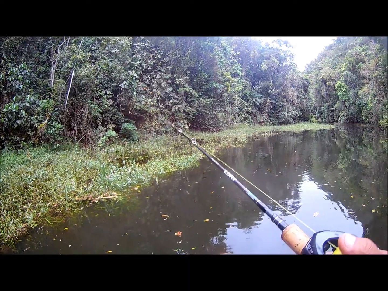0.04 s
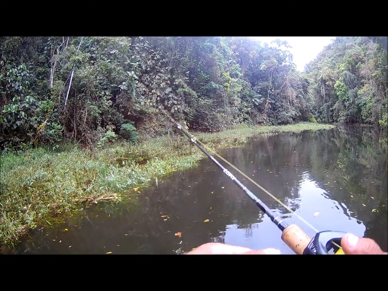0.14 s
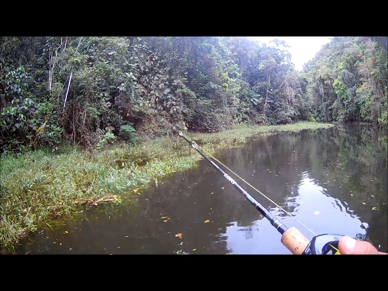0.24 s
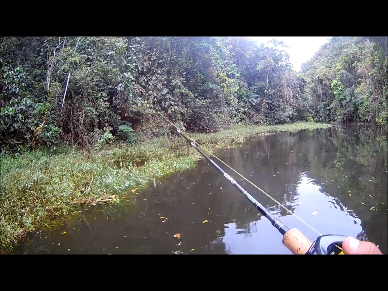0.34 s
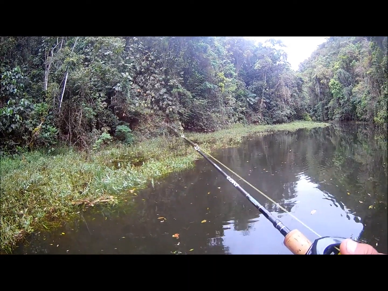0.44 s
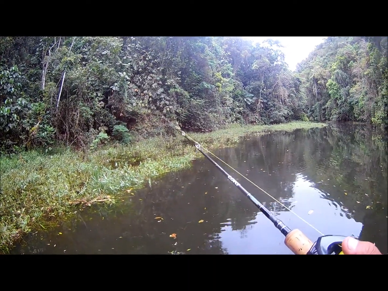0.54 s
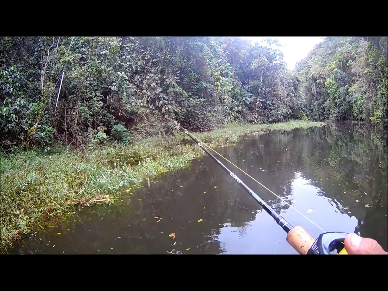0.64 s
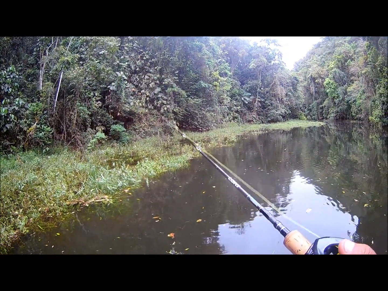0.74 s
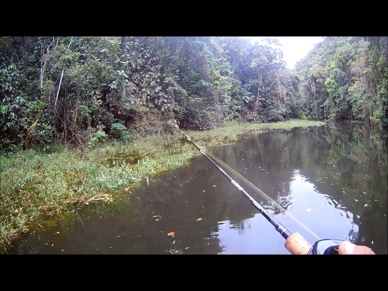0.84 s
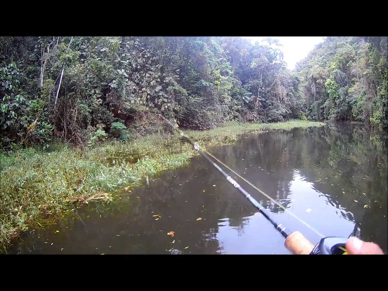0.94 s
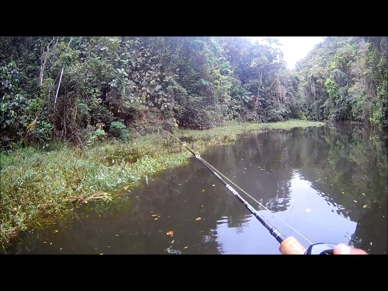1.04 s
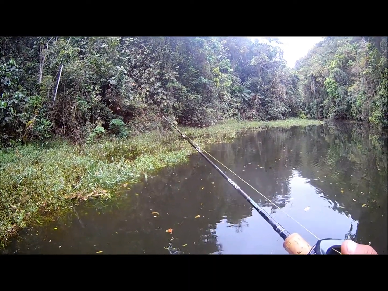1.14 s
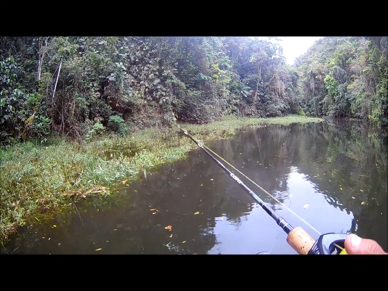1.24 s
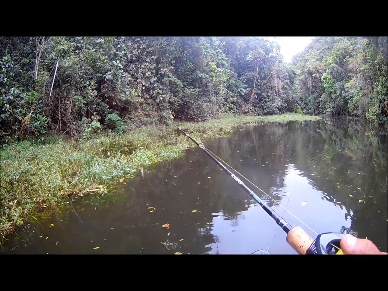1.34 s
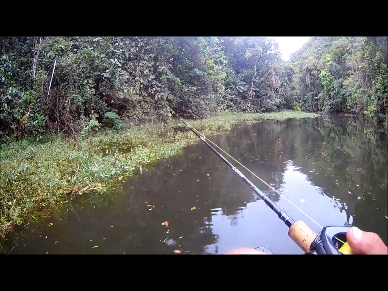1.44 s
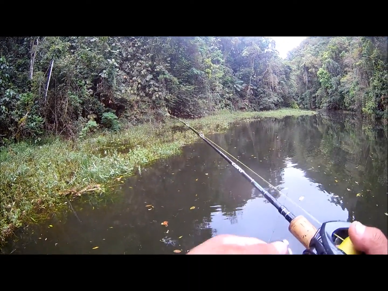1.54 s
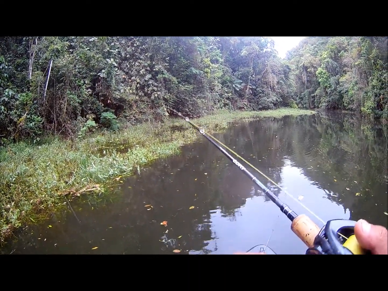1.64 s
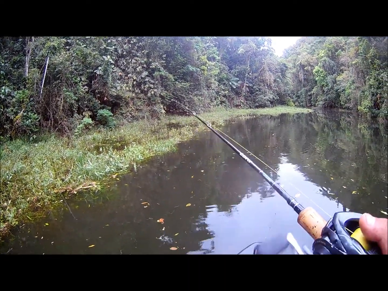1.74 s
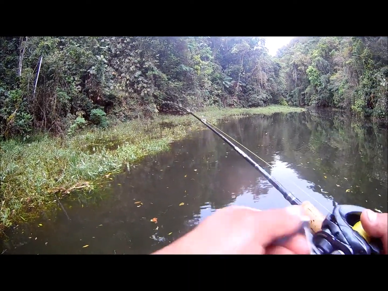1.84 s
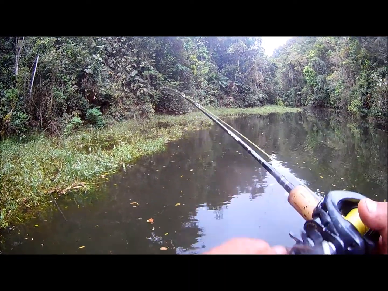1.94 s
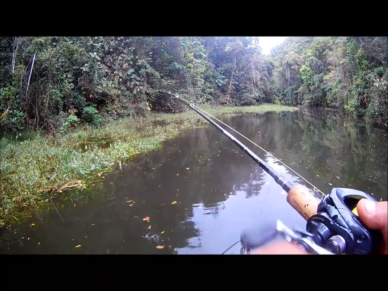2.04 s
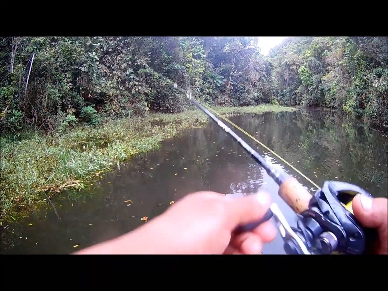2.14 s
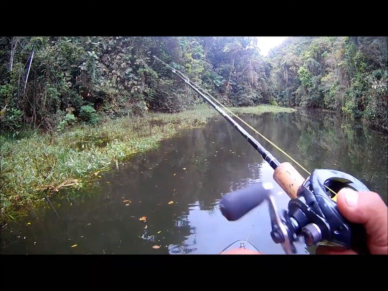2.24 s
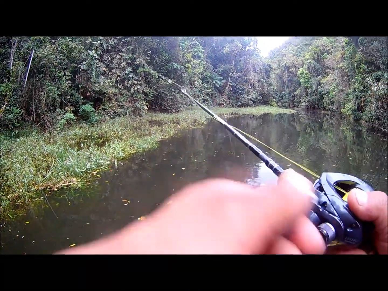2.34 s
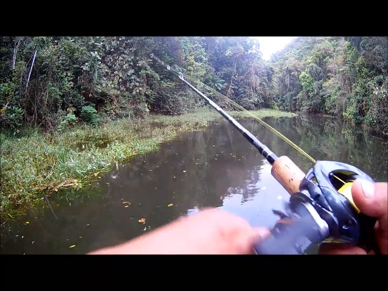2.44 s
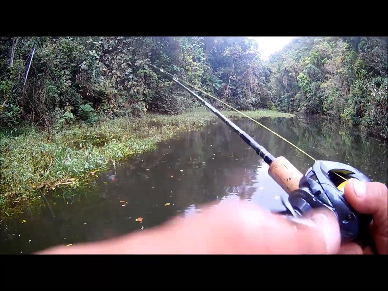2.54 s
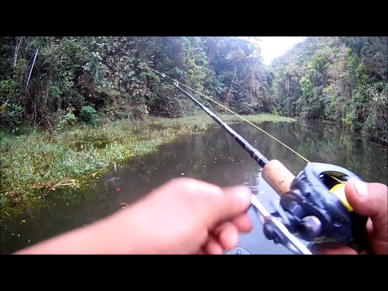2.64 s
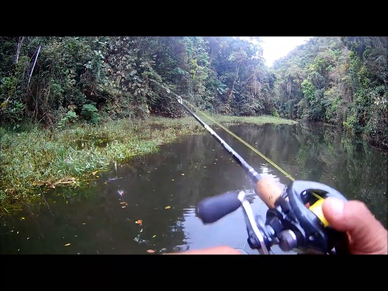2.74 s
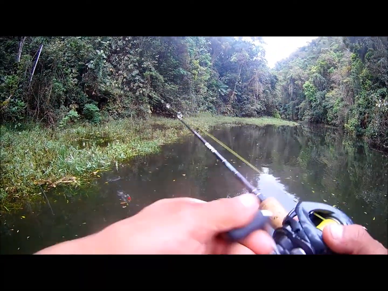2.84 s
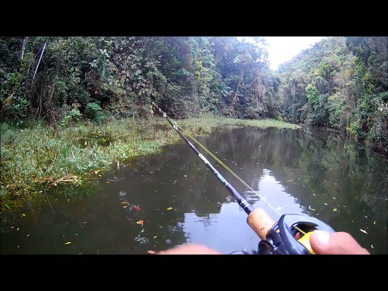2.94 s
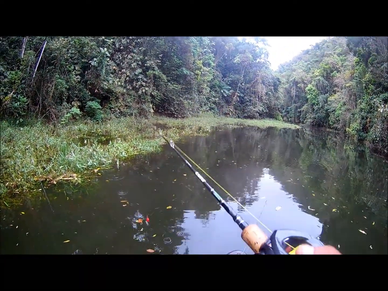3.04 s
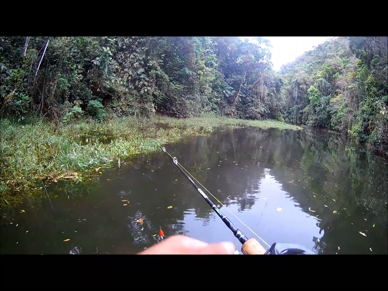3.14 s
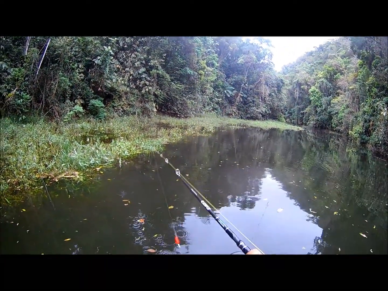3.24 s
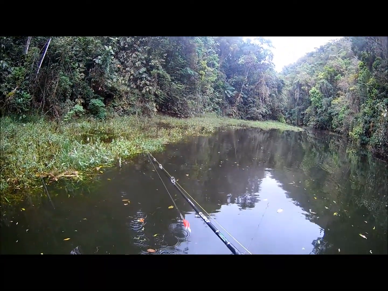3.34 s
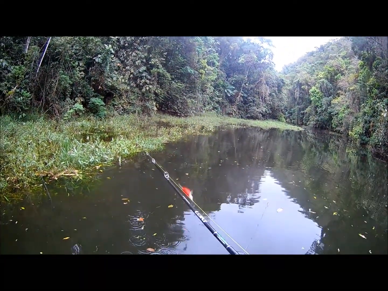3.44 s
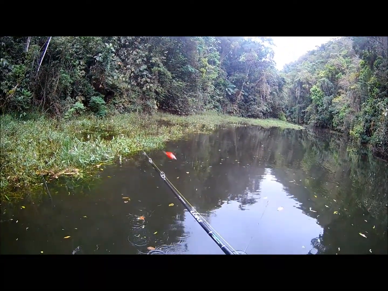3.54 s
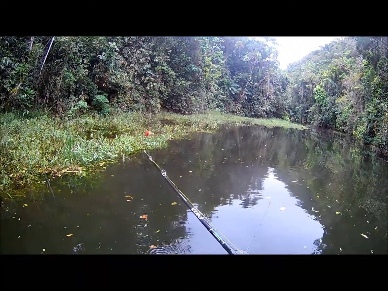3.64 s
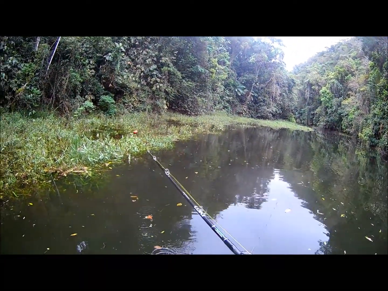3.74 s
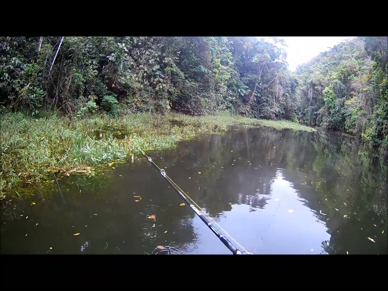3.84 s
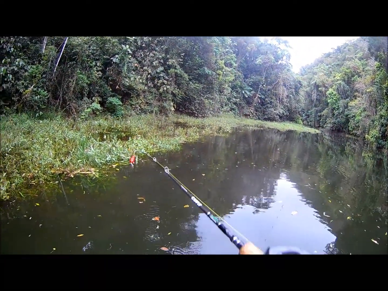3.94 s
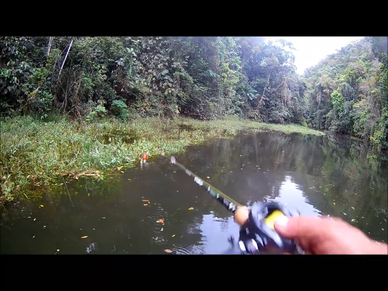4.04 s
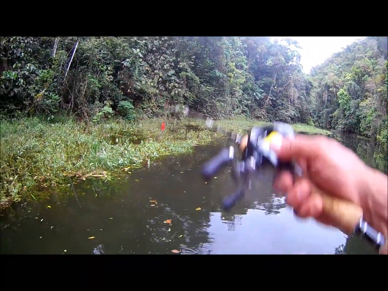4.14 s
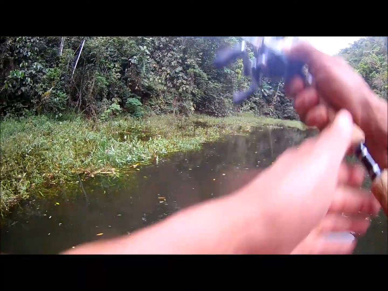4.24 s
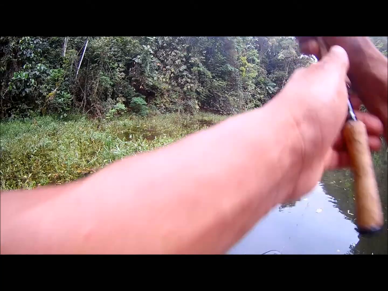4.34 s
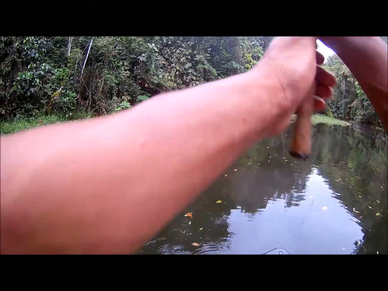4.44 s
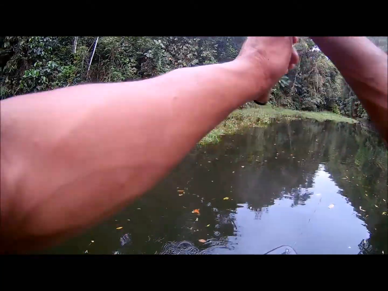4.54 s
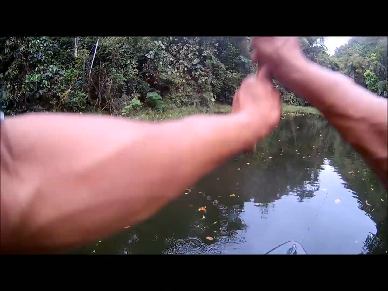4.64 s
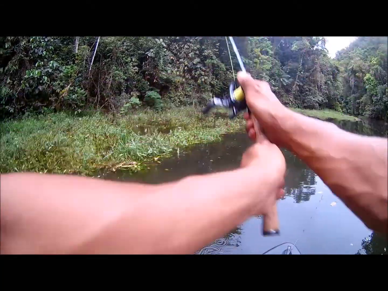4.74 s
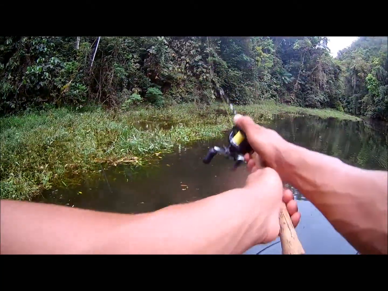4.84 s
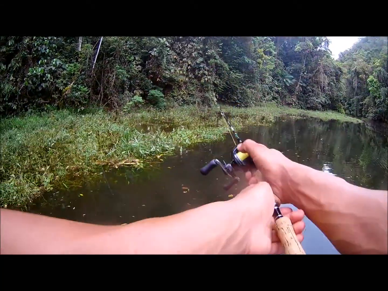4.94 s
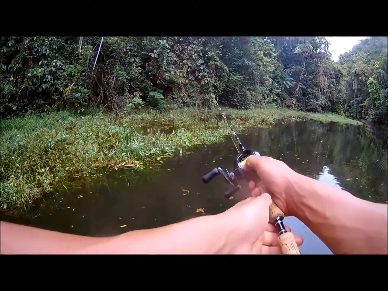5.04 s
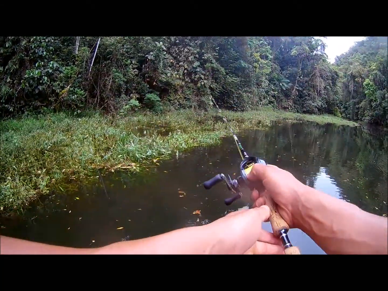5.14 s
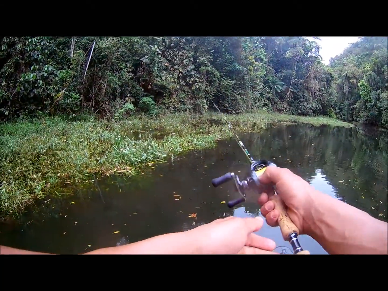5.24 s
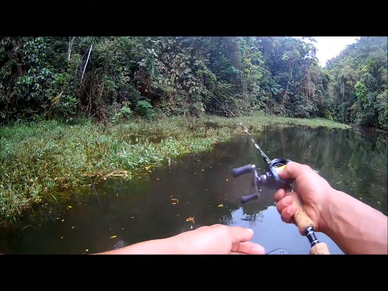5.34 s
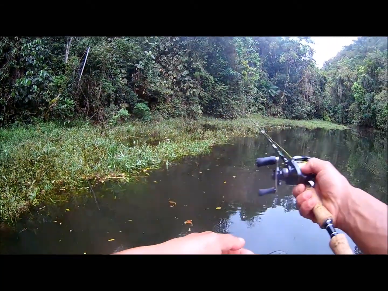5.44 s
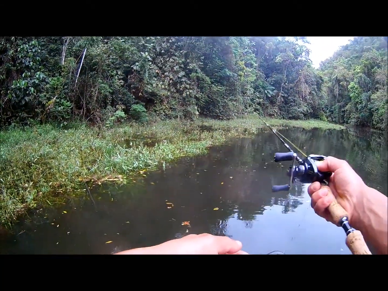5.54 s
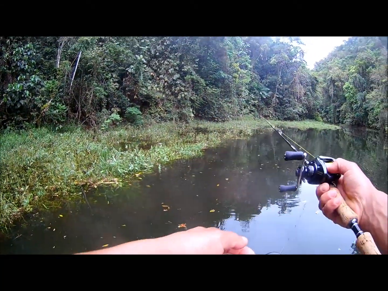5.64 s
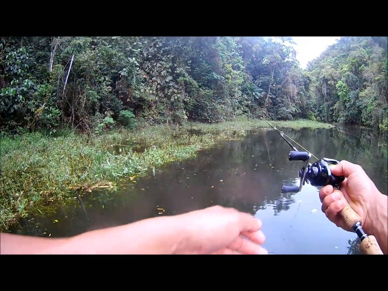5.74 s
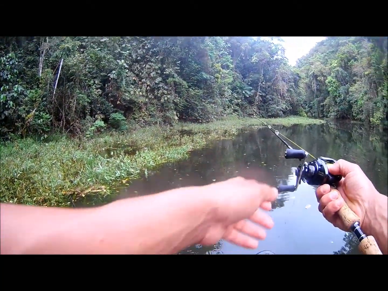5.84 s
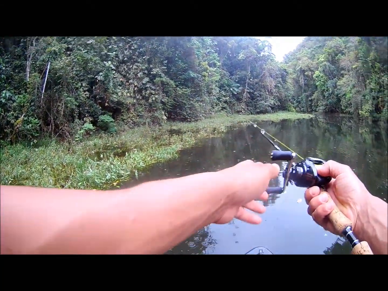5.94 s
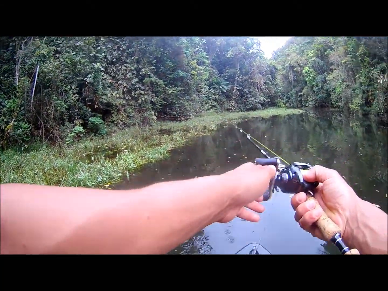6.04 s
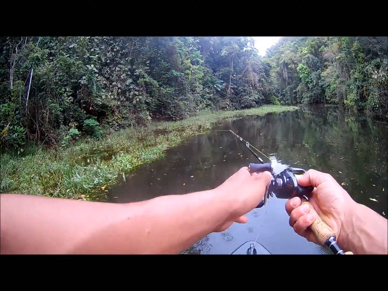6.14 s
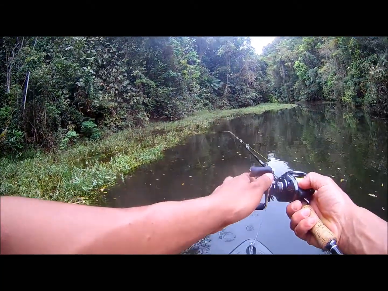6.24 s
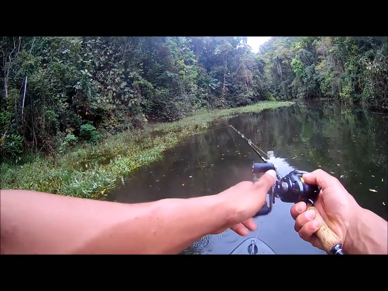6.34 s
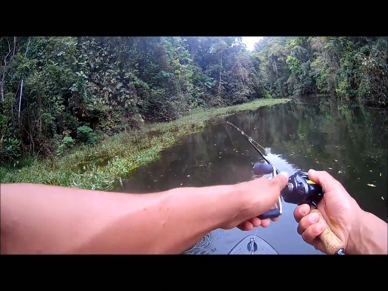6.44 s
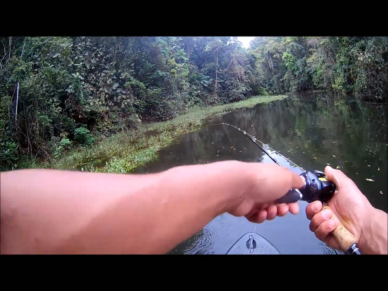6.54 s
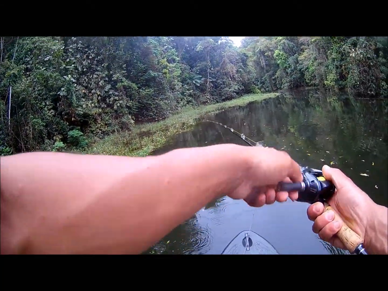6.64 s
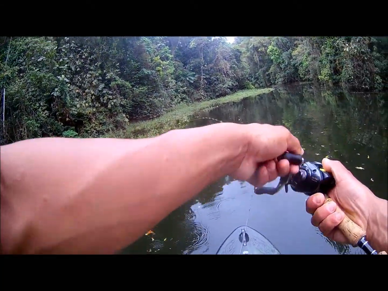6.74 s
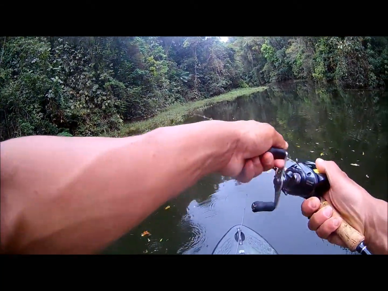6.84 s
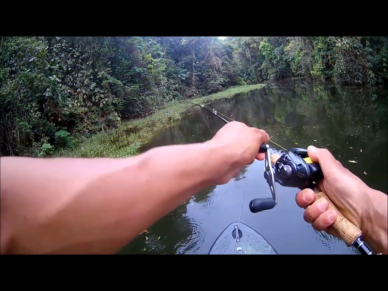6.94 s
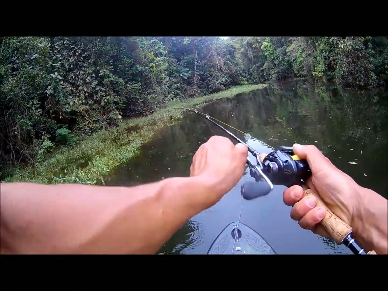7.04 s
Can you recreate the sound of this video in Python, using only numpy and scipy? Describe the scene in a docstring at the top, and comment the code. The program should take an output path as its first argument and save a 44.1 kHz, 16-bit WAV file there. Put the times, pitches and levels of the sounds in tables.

```python
"""A still lake: an angler winds in a lure with a baitcasting reel, casts, and clicks the reel back into gear.
A camera is worn on the body in a plastic case; arm movements make the case knock, chatter and rub on its mount.
Blows and slips of noise excite the damped modes of case and reel; struck mount and line ring as decaying sines.
Gears and spool are shaped noise, heard faintly over still air, microphone hiss and a low electrical buzz."""
import sys
import numpy as np
from scipy import signal
from scipy.fft import rfft, irfft, next_fast_len
from scipy.io import wavfile
from scipy.ndimage import uniform_filter1d

SR = 44100
rng = np.random.default_rng(int(sys.argv[2]) if len(sys.argv) > 2 else 0)


def dump_mix(stems):
    """Bounce the given channels to the path in sys.argv[1] as a 16-bit WAV at rate SR."""
    frames = np.atleast_2d(stems).T  # one column per channel
    limited = np.clip(frames, -1, 1)  # hard clip at full scale
    pcm = np.round(limited * 32767).astype(np.int16)
    wavfile.write(sys.argv[1], SR, pcm)


N = 312664
TIME = np.arange(N) / SR
RING_T = np.arange(8192) / SR  # time axis of one short sound
RING_HZ = np.fft.rfftfreq(len(RING_T), 1 / SR)

# resonances of the plastic case: centre_hz, width_hz, relative_db
CASE_MODES = [(140, 73, -20.5), (385.8, 72.6, -4.5), (720, 85, -6), (974, 80, -7.5), (1167, 247, 0),
              (1550, 230, -4), (1889.4, 130, -9.5), (2387, 226, -19), (3444, 150, -19), (4158, 320, -31.5),
              (4950, 400, -38.5), (6588, 480, -45.5)]


def amp(db):
    """Decibels to gain."""
    return 10 ** (np.asarray(db) / 20)


def unit_rms(x):
    """Scales to an rms of one."""
    return x / np.sqrt(np.mean(x ** 2) + 1e-30)


def unit_peak(x):
    """Scales to a peak of one."""
    return x / (abs(x).max() + 1e-30)


def add(mix, start_s, sound):
    """Mixes a sound in at start_s, cut off at the end of the mix."""
    part = mix[max(round(start_s * SR), 0):][:len(sound)]
    part += sound[:len(part)]


def spectrum_gain(points, hz):
    """Interpolates (Hz, dB) points on a log-frequency axis."""
    point_hz, point_db = np.transpose(points)
    return amp(np.interp(np.log(hz + 1), np.log(point_hz + 1), point_db))


def noise(points):
    """Steady noise of a given colour, at unit rms."""
    size = next_fast_len(N, True)
    white = rfft(rng.standard_normal(size))
    gain = spectrum_gain(points, np.fft.rfftfreq(size, 1 / SR))
    return unit_rms(irfft(white * gain, size)[:N])


def whistle(hz, width_hz):
    """A narrow band of noise that follows a pitch curve, at unit rms."""
    low_pass = signal.butter(2, width_hz / 2, fs=SR, output="sos")
    blur = signal.sosfilt(low_pass, rng.standard_normal((2, N)))
    carrier = np.exp(2j * np.pi * np.cumsum(hz) / SR)
    return unit_rms(((blur[0] + 1j * blur[1]) * carrier).real)


def softened(x, hz, order=3):
    """Takes away the treble above hz."""
    return signal.sosfilt(signal.butter(order, min(hz, SR / 2 - 1), fs=SR, output="sos"), x)


def decaying_sine(level_db, hz, t60_s):
    """A ringing tone that loses 60 dB in t60_s."""
    return amp(level_db - 60 * RING_T / t60_s) * np.sin(2 * np.pi * hz * RING_T)


def mode(hz, width_hz, db):
    """Frequency response of one damped resonance."""
    return amp(db) * width_hz * hz / (hz ** 2 - RING_HZ ** 2 + 1j * width_hz * RING_HZ)


def strike(body, contact_hz):
    """A body's answer to one blow; a soft contact lasts longer and leaves out the treble."""
    return unit_peak(irfft(body / (1 + 1j * RING_HZ / contact_hz) ** 2))


def case_response(shift_db, in_phase=3, low_hz=280, top_hz=6600):
    """The low modes move the microphone together, upper ones alternate in sign; the wall shuts out top treble."""
    # where neighbouring modes cancel: centre_hz, width_hz
    case_dips = [(220, 110), (575, 90)]
    response = 0
    for k, (hz, width_hz, db) in enumerate(CASE_MODES):
        sign = (-1) ** max(k - in_phase, 0)
        response = response + sign * mode(hz, width_hz, db + shift_db[k])
    for hz, width_hz in case_dips:
        response = response * (1 - 1j * RING_HZ / hz * mode(hz, width_hz, 0))  # notch
    wall = signal.sosfreqz(signal.butter(4, top_hz, fs=SR, output="sos"), RING_HZ, fs=SR)[1]
    return response * wall * 1j * RING_HZ / (low_hz + 1j * RING_HZ)


def background(floor_db=-68, hum_hz=30):
    """Still air below and microphone hiss above, with a low buzz of harmonics from the camera's electronics."""
    # colour of air and hiss: freq_hz, relative_density_db
    floor_colour = [(5, -24), (22, 0), (140, 1), (300, -2.5), (600, -7), (950, -9.5), (1400, -11.5),
                    (2300, -16.5), (3600, -19.5), (4700, -22), (7300, -23.5), (8600, -26.5), (11500, -25.5),
                    (15500, -21.5)]
    # harmonics of the buzz: multiple, rms_db
    hum_partials = [(1, -71.5), (3, -75), (5, -80), (7, -88.5), (11, -88.5)]
    buzz = np.zeros(N)
    for multiple, rms_db in hum_partials:
        cycles = multiple * hum_hz * TIME + rng.random()
        buzz += amp(rms_db) * np.sqrt(2) * np.sin(2 * np.pi * cycles)
    return amp(floor_db) * noise(floor_colour) + buzz


def line_motion(rise_s=0.079, fade_db_per_s=64, idle_db=-91):
    """Whirr level: each spell of winding rises, holds and fades; the cast swells until the rod stops, then dies."""
    # spells of winding: start_s, length_s, rms_db
    windings = [(0, 0.72, -81.5), (.95, 0.36, -78.5), (1.622, 0.53, -70.5), (2.196, .35, -74),
                (2.522, 0.59, -72.5), (3.5, 0.62, -75.5)]
    swing_start_s, swing_stop_s = 4.28, 4.84
    swish_db, swish_rise_db_per_s, swish_fade_db_per_s = -67, 13.5, 27
    power = amp(idle_db) ** 2
    for start_s, length_s, rms_db in windings:
        rise = np.clip((TIME - start_s) / rise_s, 0, 1)
        past_end_s = np.maximum(TIME - start_s - length_s, 0)
        power = power + (rise * amp(rms_db - fade_db_per_s * past_end_s)) ** 2
    after_stop_s = TIME - swing_stop_s
    swell_db = np.minimum(swish_rise_db_per_s * after_stop_s, -swish_fade_db_per_s * after_stop_s)
    swish = np.clip((TIME - swing_start_s) / rise_s, 0, 1) * amp(swish_db + swell_db)
    return np.sqrt(power + swish ** 2)


def gears(grain_db=2.5, surge_db=2.0, whine_db=-6, whine_hz=1450, whine_width_hz=70, wander=.12):
    """A grainy whirr follows reel and cast and surges with the hand; a faint whine wavers with the surges."""
    # colour of the whirr: freq_hz, relative_db
    gear_colour = [(300, -29.5), (900, -12.5), (1200, 2), (1400, 0), (1850, -2), (2300, -16.5), (3300, -14),
                   (4500, -24.5), (9000, -38)]
    grain = unit_rms(uniform_filter1d(rng.standard_normal(N), size=400))
    surge = unit_rms(uniform_filter1d(rng.standard_normal(N), size=2500))
    whine_curve_hz = whine_hz * (1 + wander * uniform_filter1d(surge, size=1500))
    whine = whistle(whine_curve_hz, whine_width_hz)
    whirr = noise(gear_colour) + amp(whine_db) * whine
    whirr = whirr * amp(grain_db * grain + surge_db * surge)
    return line_motion() * unit_rms(whirr)


def faint_ticks(ticks_per_s=2, level_db=-62, spread_db=2, t60_s=0.028, count=32):
    """Ticks at random (Poisson) moments: start_s, peak_db, t60_s."""
    chance = rng.random((count, 2))
    starts_s = np.cumsum(-np.log(1 - chance[:, 0])) / ticks_per_s
    peaks_db = level_db + spread_db * (2 * chance[:, 1] - 1)
    return [(s, db, t60_s) for s, db in zip(starts_s, peaks_db) if s < N / SR]


def ticks(snap=7):
    """Line and handle tick: a small impact followed by a dying rattle of loose parts."""
    # the clearest ticks: start_s, peak_db, t60_s
    clear_ticks = [(0.26, -54.5, .035), (.5133, -54.5, .032), (0.6704, -51, .016), (1.0654, -54, 0.038),
                   (1.4394, -51.5, 0.019), (2.3737, -51, 0.016), (2.456, -51, .02), (2.589, -44, 0.016),
                   (3.1044, -49, .018), (3.8475, -47, .015), (4.7736, -48, .012), (4.8294, -49, .03),
                   (5.9974, -55, .02), (6.637, -56, .018), (6.6973, -50.5, 0.056), (6.806, -48, 0.051)]
    # colour of a tick: freq_hz, relative_db
    tick_colour = [(200, -18.5), (600, -14.5), (950, -5), (1300, 4), (1850, -3.5), (2500, -16),
                   (3500, -16.5), (5000, -27), (8000, -38), (16000, -51.5)]
    out = np.zeros(N)
    # minimum phase: nothing sounds before the impact
    cepstrum = irfft(np.log(spectrum_gain(tick_colour, RING_HZ)))
    cepstrum[1:] *= 2 * (RING_T[1:] < RING_T[-1] / 2)
    colour = np.exp(rfft(cepstrum))
    for start_s, peak_db, t60_s in clear_ticks + faint_ticks():
        rattle = rng.standard_normal(len(RING_T)) * amp(-60 * RING_T / t60_s)
        rattle[0] += snap
        add(out, start_s, amp(peak_db) * unit_peak(irfft(rfft(rattle) * colour)))
    return out


def chatter(gap_shrink=0.96, uneven_gap=.11, uneven_db=1.24, loss_power=0.67, softening=0.34, softest_hz=556):
    """Knocks and their rebounds, on average ever sooner, weaker and softer: start_s, peak_db, hardness_hz."""
    # start_s, peak_db, hardness_hz (before the strength scaling in knocks), rebounds (rounded),
    # first_gap_s, first_loss_db
    knock_events = [(0.7401, -26.5, 800, 1, .0115, 17), (2.8565, -14, 1450, 2, 0.0072, 12),
                    (3.819, -22, 850, 3, 0.0063, 8.5), (3.875, -37.5, 600, 0, 0, 0),
                    (4.047, -44.5, 500, 1, 0.0064, 1), (4.5955, -22.5, 1000, 6, .0116, 7),
                    (4.7253, -28.5, 850, 2.5, .0098, 1.5), (4.7541, -31, 1000, 1, .0081, 0),
                    (4.849, -8, 2600, 0, 0, 0), (4.874, -3.5, 3000, 3.5, .008, 11),
                    (4.9098, -18, 1600, 0, 0, 0), (4.9138, -14.5, 1800, 4, .0048, 2.2),
                    (4.9936, -5, 2400, 0, 0, 0), (5.0043, -9.5, 1700, 2, .0066, 9.5),
                    (5.5027, -45, 500, 0, 0, 0)]
    for start_s, peak_db, hard_hz, rebounds, gap_s, loss_db in knock_events:
        yield start_s, peak_db, hard_hz
        for k in range(round(rebounds)):
            late, weak = rng.standard_normal(2)
            start_s += gap_s * gap_shrink ** k * (1 + uneven_gap * late)
            lost_db = loss_db * (k + 1) ** loss_power + uneven_db * weak
            softer_hz = hard_hz * amp(-softening * lost_db)
            yield start_s, peak_db - lost_db, max(softer_hz, softest_hz)


def knocks(hardness=1.5, stiffening=0.21, bend_hz=1600, spread_db=1.27):
    """Each knock lands on a slightly different spot, grates for a moment, and rings case and mount."""
    # longer ringing of the mount: freq_hz, t60_s, db_re_knock
    mount_modes = [(373, 0.11, -39), (448, 0.12, -39), (723.5, 0.2, -41), (830, 0.075, -36),
                   (1054, .06, -34), (1460, 0.34, -51), (1540, 0.095, -37.5), (2154, 0.13, -51)]
    grit_db, grit_t60_s, grit_hz = -26, 0.042, 2600
    rebound_share, rebound_hz = .5, 1400
    out = np.zeros(N)
    mount = sum(decaying_sine(db, hz, t60_s) for hz, t60_s, db in mount_modes)
    bending = (bend_hz - 1j * RING_HZ) / (bend_hz + 1j * RING_HZ)  # low bending waves travel slower
    treble = signal.butter(2, grit_hz, "high", fs=SR, output="sos")
    for start_s, peak_db, hard_hz in chatter():
        case = case_response(spread_db * rng.standard_normal(len(CASE_MODES)))
        grit = signal.sosfilt(treble, rng.standard_normal(len(RING_T)))
        blow = grit * amp(grit_db - 60 * RING_T / grit_t60_s)
        blow[0] += 1
        # hard blows spring back: less bass
        bass_loss = rebound_share * hard_hz / (hard_hz + rebound_hz)
        rebound = 1 - bass_loss / (1 + 1j * RING_HZ / rebound_hz)
        contact_hz = hard_hz * hardness * amp(stiffening * peak_db)  # stronger blow, shorter contact
        ringing = strike(case * rebound * bending * rfft(blow), contact_hz)
        add(out, start_s, amp(peak_db) * (ringing + mount))
    return out


def rubs(slips_per_s=520, grit=.07, gentle_db=-57.5, gentle_hz=640, db_per_octave=9.5):
    """The strap drags over the case: swells of tiny random slips, brighter when stronger than a gentle drag."""
    # middle_s, length_s, rms_db
    drags = [(1.01, 0.018, -62.5), (2.893, 0.032, -58), (3.047, 0.053, -64.5), (3.43, .06, -66),
             (3.861, 0.053, -58.5), (4.072, 0.11, -61.5), (4.265, 0.073, -58.5), (4.649, 0.072, -57),
             (4.885, .038, -36.5), (4.919, .043, -27.5), (5.496, .06, -58.5), (5.718, .06, -65),
             (6.701, 0.02, -64), (6.81, 0.023, -63)]
    case = irfft(case_response(np.zeros(len(CASE_MODES))))
    out = np.zeros(N)
    slips = rng.standard_normal(N) * (grit + (rng.random(N) < slips_per_s / SR))
    for middle_s, length_s, rms_db in drags:
        start, size = round((middle_s - length_s / 2) * SR), round(length_s * SR)
        swell = signal.windows.hann(size) ** .8
        drag = signal.fftconvolve(slips[start:start + size] * swell, case)
        octaves = max(rms_db - gentle_db, 0) / db_per_octave
        drag = softened(drag, gentle_hz * 2 ** octaves)
        add(out, start / SR, amp(rms_db) * drag * np.sqrt(size / np.sum(drag ** 2)))
    return out


def thumb(middle_s=4.07, length_s=0.068, rms_db=-55, hz=1090, width_hz=190):
    """The thumb skids over the bar with a short narrow squeak before it presses the clutch."""
    size, out = round(length_s * SR), np.zeros(N)
    skid = rng.standard_normal(size) * signal.windows.hann(size)
    squeak = signal.fftconvolve(skid, irfft(mode(hz, width_hz, 0) ** 2))
    add(out, middle_s - length_s / 2, amp(rms_db) * squeak * np.sqrt(size / np.sum(squeak ** 2)))
    return out


def clutch(rattle_db=-28, rattle_t60_s=0.023, radiate_hz=1000):
    """The thumb bar and its return spring strike the reel frame, which is too small to radiate bass."""
    # pressed before the cast, snapping back after it:
    # start_s, peak_db, contact_hz, back (0 pressed, 1 snapping back)
    clutch_blows = [(4.1015, -50, 600, 0), (4.105, -34, 3000, 0.16), (6.361, -52.5, 3000, 1),
                    (6.3741, -52.5, 1100, 1), (6.3764, -30.5, 3600, 0.83)]
    # resonances of the reel frame: centre_hz, width_hz, pressed_db, back_db
    reel_modes = [(1220, 105, 7, -16.5), (1465, 72, -4, -8.5), (1796, 150, -6.5, -9), (2910, 126, -8.5, -8),
                  (3315, 240, -7.5, 2.5), (3706, 394, -12.5, 3.5), (5820, 380, -8.5, -22),
                  (6130, 250, -10, -16.5), (10700, 990, -3, -24), (12400, 600, -6, -21)]
    out = np.zeros(N)
    radiation = (1j * RING_HZ / (radiate_hz + 1j * RING_HZ)) ** 2
    for start_s, peak_db, contact_hz, back in clutch_blows:
        frame = 0
        for k, (hz, width_hz, pressed_db, back_db) in enumerate(reel_modes):
            db = pressed_db + back * (back_db - pressed_db)
            frame = frame + (-1) ** k * mode(hz, width_hz, db)
        blow = rng.standard_normal(len(RING_T)) * amp(rattle_db - 60 * RING_T / rattle_t60_s)
        blow[0] += 1
        add(out, start_s, amp(peak_db) * strike(frame * radiation * rfft(blow), contact_hz))
    return out


def spool(whizz_hz=3540, sag_hz_per_s=69, width_hz=640):
    """Jerked up to speed, the spool whizzes, sags and fades until the thumb stops it; the line pings once."""
    # the line whips against a guide: start_s, peak_db, pitch_hz, t60_s
    line_ping = (4.775, -47, 3120, 0.07)
    release_s, spin_up_s, stop_s, brake_s = 4.715, .045, 6.03, 0.035
    jerk_db, jerk_t60_s, coast_db, coast_db_per_s = -64, .1, -81, 1.5
    flight_s = np.maximum(TIME - release_s - spin_up_s, 0)
    running = np.clip((TIME - release_s) / spin_up_s, 0, 1) * np.clip((stop_s - TIME) / brake_s, 0, 1)
    jerk = amp(jerk_db - 60 * flight_s / jerk_t60_s)
    coast = amp(coast_db - coast_db_per_s * flight_s)
    out = running * (jerk + coast) * whistle(whizz_hz - sag_hz_per_s * flight_s, width_hz)
    ping_s, ping_db, ping_hz, ping_t60_s = line_ping
    add(out, ping_s, decaying_sine(ping_db, ping_hz, ping_t60_s))
    return out


def jolt(start_s=4.872, level_db=-39.0, hz=48, t60_s=.11):
    """The stop of the cast shakes the whole camera once, a low decaying sine."""
    out = np.zeros(N)
    add(out, start_s, decaying_sine(level_db, hz, t60_s))
    return out


def mount_ring(start_s=4.935, level_db=-40, hz=754, t60_s=0.16):
    """The strap lets go after the hardest drag and leaves the mount humming, a decaying sine."""
    out = np.zeros(N)
    add(out, start_s, decaying_sine(level_db, hz, t60_s))
    return out


def scene():
    """Everything reaches the one microphone dry: open water throws nothing back."""
    reel = gears() + ticks() + thumb() + clutch() + spool()
    camera = knocks() + rubs() + jolt() + mount_ring()
    return (background() + reel + camera)[None]


def record(dry, edge_hz=15850):
    """The camera's band limit, a linear-phase low-pass."""
    low_pass = signal.firwin(511, edge_hz, window=("kaiser", 9), fs=SR)
    return signal.oaconvolve(dry, low_pass[None], "same")


dry = scene()
out = record(dry)
dump_mix(out)
```